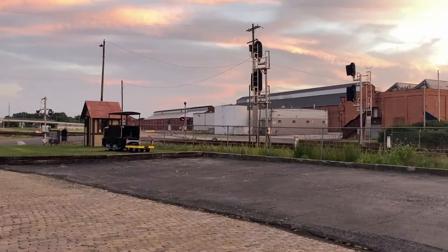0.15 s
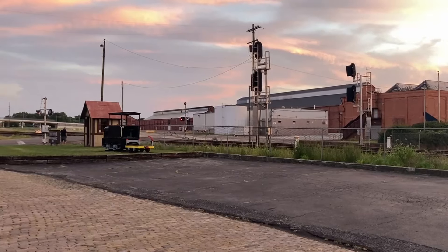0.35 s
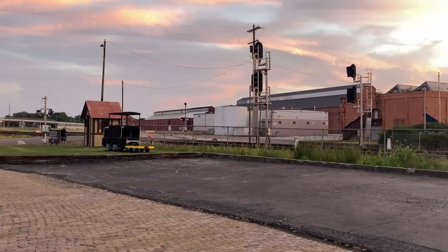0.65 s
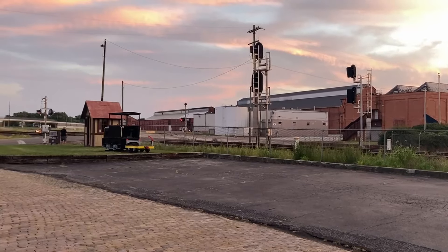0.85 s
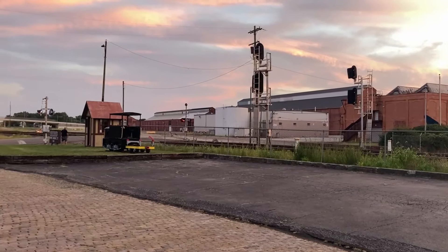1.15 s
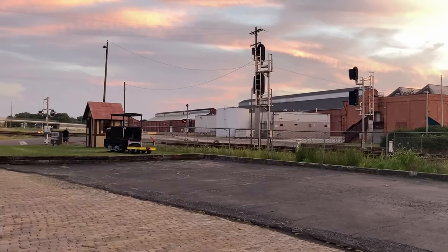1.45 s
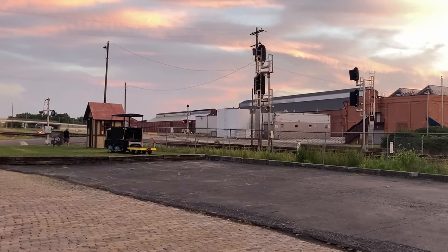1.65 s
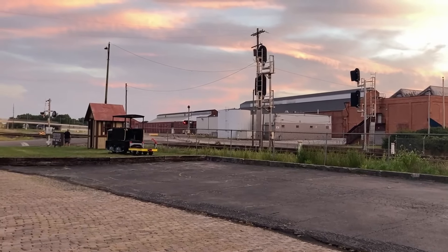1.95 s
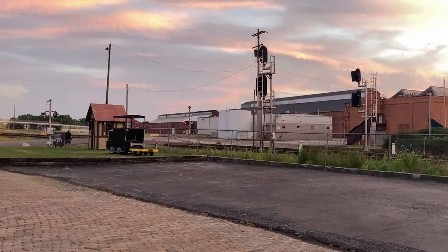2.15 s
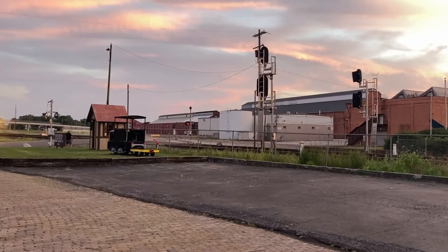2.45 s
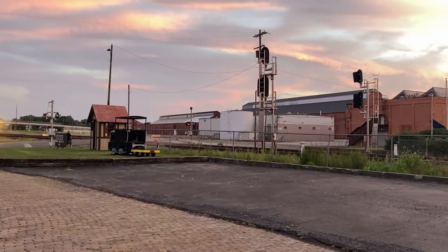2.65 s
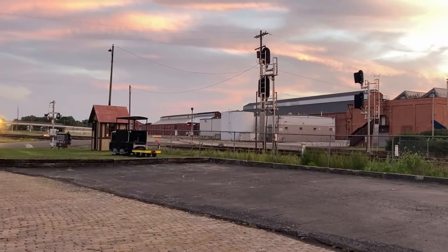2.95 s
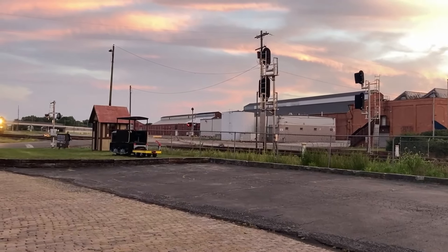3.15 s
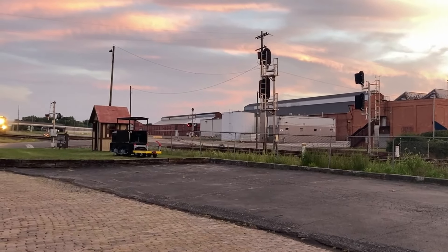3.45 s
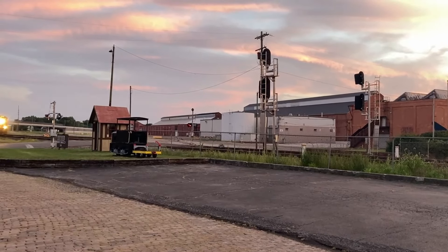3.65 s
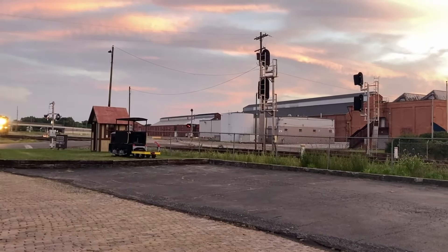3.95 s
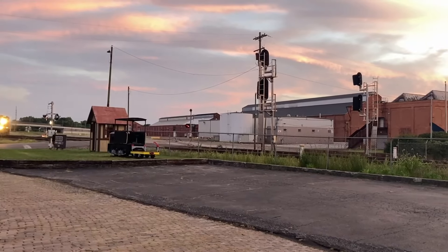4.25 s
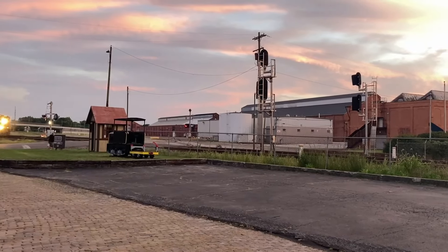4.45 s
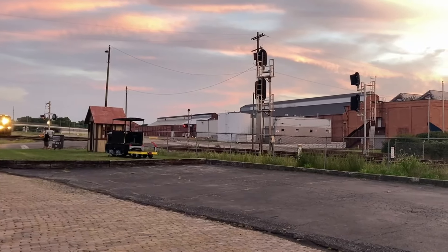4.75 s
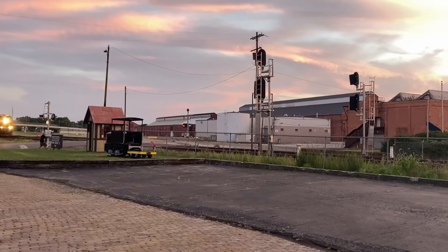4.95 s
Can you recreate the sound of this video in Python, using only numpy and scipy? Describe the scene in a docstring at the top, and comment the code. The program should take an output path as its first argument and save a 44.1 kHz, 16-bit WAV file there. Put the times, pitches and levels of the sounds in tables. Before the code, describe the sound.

Outdoors by a rail yard, a low diesel rumble with wavering hums and two faint crossing gongs. Just before two seconds a loud five-note air horn blows for about a second and a half, its tone swelling and fading, leaving a dull echo. After a tiny rustle close to the microphone, a second, brighter blast holds to the end. Stereo handheld pickup, slightly overloaded.

```python
"""A freight locomotive nears a level crossing: diesel rumble in noise bands, wavering hums, two far gongs.
At 1.9 s its five-bell air horn blows; each bell is a reed-like diaphragm giving a stack of harmonics.
Echoes off sheds along the track arrive slightly flat, so every partial swells and fades; a dull tail follows.
A bright rustle close by comes just before the second, brighter blast at 4.3 s, which holds to the end."""
import sys
import numpy as np
from scipy import signal
from scipy.fft import next_fast_len
from scipy.io import wavfile
from scipy.ndimage import uniform_filter1d

SR = 44100
rng = np.random.default_rng(int(sys.argv[2]) if len(sys.argv) > 2 else 0)


def wrap_up_sound(samples):
    """Save the sound to the file named by the first command line argument, as 16-bit audio."""
    columns = np.atleast_2d(samples).T
    # keep every value between -1 and 1, then stretch to whole-number steps
    tamed = np.clip(columns, -1, 1)
    steps = np.round(tamed * 32767).astype(np.int16)
    wavfile.write(sys.argv[1], SR, steps)


N = 224414
STEP = 16   # samples per step of slow signals


def from_db(db):
    """Decibels to amplitude."""
    return 10 ** (np.asarray(db) / 20)


def rms_one(x):
    """Scale to an rms of one."""
    return x / np.sqrt(np.mean(np.abs(x) ** 2) + 1e-20)


def in_time(rows, t):
    """Draw each column of an automation table as straight lines over time."""
    s, *columns = np.transpose(rows)
    return [np.interp(t, s, column) for column in columns]


def at_hz(points, hz):
    """Read a spectral curve, straight over log frequency."""
    curve_hz, values = np.array(points).T
    return np.interp(np.log(hz), np.log(curve_hz), values)


def filtered(x, order, hz, kind="low"):
    """Butterworth filter."""
    return signal.sosfilt(signal.butter(order, hz, kind, fs=SR, output="sos"), x)


def wander(rate_hz, size, channels=1):
    """Slow complex noise, one value per STEP: white through a double one-pole low-pass, rms 1."""
    run_in = 1000
    r = np.exp(-2 * np.pi * STEP * rate_hz / SR)
    shape = (channels, size + run_in)
    white = rng.standard_normal(shape) + 1j * rng.standard_normal(shape)
    return rms_one(signal.lfilter([1], [1, -2 * r, r * r], white)[:, run_in:])


def spread(slow, size):
    """Bring slow rows up to one value per sample."""
    return np.array([np.interp(np.arange(size) / STEP, np.arange(len(row)), row) for row in slow])


def wander_full(rate_hz, channels=1):
    """Slow complex noise over the whole scene, one value per sample."""
    return spread(wander(rate_hz, N // STEP + 1, channels), N)


# Diesel spectrum: pitch_hz, level_db (relative, per Hz)
RUMBLE = [(20, -36), (40, -11), (69, -3.5), (110, -13), (241, -22), (444, -37), (650, -35), (954, -30.5),
          (1360, -38.5), (2000, -43), (3150, -47.5), (3450, -55), (6120, -51.5), (9000, -79), (11000, -99)]
# Stereo likeness of the rumble: pitch_hz, likeness (1 = same in both ears)
LIKENESS = [(60, 1), (170, 1), (500, 0.97), (1400, 0.51), (4000, 0.35), (9000, 0.84)]
# Hums: pitch_hz, width_hz, level_db (over the rumble, before the bass shelf)
HUMS = [(60, 9.0, -6), (269, 6.0, -13), (802, 10.0, -24.5), (920, 15.0, -23), (985, 18.0, -21.5),
        (1060, 15.0, -25), (3068, 18.0, -33.5), (3200, 60.0, -36)]
BASS_BELOW_HZ, TREBLE_ABOVE_HZ = 110, 5000
HUM_PATCHY_DB = 4     # how deeply the far hums come and go on the air
RUMBLE_PAN_DB = 1.9   # left over right


def engine(bass_db, treble_db, patchy_db):
    """Third-octave bands of stereo noise with slow flicker, plus narrow wavering hums."""
    out = 0
    edges = 22 * 2 ** np.arange(0, 9.2, 1 / 3)
    white = rng.standard_normal((2, 2, N))   # neighbouring bands take different noise
    for k, (low, high) in enumerate(zip(edges, edges[1:])):
        mid, side = filtered(white[k % 2], 2, [low, high], "band")
        hz = np.sqrt(low * high)
        alike = np.clip(at_hz(LIKENESS, hz), 0, 1)
        flicker_db = patchy_db * wander_full(4.1)[0].real
        gain = from_db(at_hz(RUMBLE, hz) + treble_db * (hz > TREBLE_ABOVE_HZ) + flicker_db)
        out = out + gain * (np.sqrt(1 + alike) * mid + np.sqrt(1 - alike) * side * [[1], [-1]])
    out = rms_one(out)
    t = np.arange(N) / SR
    for hz, width_hz, db in HUMS:
        patches = from_db(HUM_PATCHY_DB * (hz > 500) * wander(3.0, N // STEP + 1).real)
        waver = spread(patches * wander(width_hz, N // STEP + 1), N)
        out = out + from_db(db) * np.real(waver * np.exp(2j * np.pi * hz * t))
    bass_filter = signal.butter(2, BASS_BELOW_HZ, fs=SR, output="sos")
    bass = signal.sosfiltfilt(bass_filter, out)
    shelved = out + (from_db(bass_db) - 1) * bass
    return shelved * from_db([[RUMBLE_PAN_DB / 2], [-RUMBLE_PAN_DB / 2]])


STROKE_S = .002   # rise time of a struck mode


def ring(s, hz, db, t60):
    """A mode struck at s: a sine with a fast rise and an exponential decay."""
    since = np.maximum(np.arange(N) / SR - s, 0)
    return from_db(db - 60 * since / t60) * (1 - np.exp(-since / STROKE_S)) * np.sin(2 * np.pi * hz * since)


# Crossing gongs: start_s, period_s, modes [pitch_hz, level_db (over the rumble), t60_s]
GONGS = [(.65, .68, [(1575, -24, 1.2), (1612, -21, .4), (2907, -31, 1.5)]), (.09, .68, [(1760, -26, 3.0),
         (1769, -27, 3.0)])]
GONG_WAVER, GONG_WAVER_HZ = .55, 14.0   # far strokes come and go on the air: depth, rate


def gongs():
    """Each gong is struck at a steady pace, a little harder or softer per mode, and rings in its few modes."""
    out = 0
    for first_s, period_s, modes in GONGS:
        strokes = 0
        for s in np.arange(first_s, N / SR, period_s):
            for hz, db, t60 in modes:
                strokes = strokes + ring(s, hz, db + rng.normal(0, 2.3), t60)
        out = out + (1 + GONG_WAVER * wander_full(GONG_WAVER_HZ)[0].real) * strokes
    return out


# Horn valve: open_s, shut_s, gone_s
BLASTS = [(1.88, 3.3, 3.55), (4.27, 5.2, 5.2)]
# Reference pitch, one curve per blast: time_s, pitch_hz
PITCH = [
    [(1.88, 414), (1.96, 412.5), (2.15, 407.6), (2.35, 407.8), (2.7, 401.1), (2.95, 407.3), (3.2, 407.5),
     (3.4, 404.5)],
    [(4.27, 416), (4.34, 410.4), (4.55, 409), (4.77, 404.7), (4.9, 410.3), (5.09, 409.5)],
]
# Upper harmonics come and go as sheds hide the horn, one curve per blast: time_s, level_db
BLARE = [
    [(1.9, -36), (1.97, -35), (2.036, -28), (2.506, -28.5), (2.64, -29), (2.9, -36), (2.988, -31),
     (3.214, -40), (3.274, -34.5), (3.3, -40.5)],
    [(4.28, -34.5), (4.36, -31), (4.516, -23.5), (4.65, -31), (4.74, -29.5), (4.81, -32), (4.97, -24),
     (5.06, -22.5)],
]
# Tone colour of the upper harmonics: pitch_hz, level_db (over the blare)
FLARE = [(600, -5.5), (1000, -12.5), (1200, -19.5), (1330, -19), (1560, -21), (1830, -25), (2050, -25),
         (2650, -26), (2850, -32), (3200, -30), (3600, -37.5), (4000, -32), (4900, -46), (5600, -56),
         (8100, -50.5), (9100, -60), (9800, -90.5), (10600, -56.5), (12000, -59.5)]
# Echoes from the sides, opposite in the two ears: pitch_hz, level_db (against the sound from ahead)
SIDEWAYS = [(330, -11), (500, -6), (1000, -4), (3600, -4), (6000, 3), (8200, -8), (9200, -4)]
# Top octave lift of each blast, the second being nearer: level_db
BRIGHTER_DB = [2.1, 4.5]
TREBLE_SWING, BLARE_MEAN_DB = 0.58, -30.5   # extra top-octave dB per dB of blare away from this mean
FADING_DB, FADING_HZ = 4, 5.0               # slow fading of overtones: depth, rate
BITE_DB, BITE_S, BITE_ABOVE = 5.5, .1, 1.5  # bells above this pitch ratio start with bright overtones
# Echo scatter: level at 500 Hz and its ceiling, trim for strong partials; spread and flatness as pitch ratios
SCATTER_DB, SCATTER_TOP_DB, STRONG_ECHO_DB = -5, -1.0, -6
SCATTER_SPREAD, SCATTER_FLAT = 0.009, .004
ECHOES_GATHER_S = 0.045   # the direct wave comes first, clean
SIDEWAYS_HZ, SIDEWAYS_EVEN_S = 3.0, .25   # drift rate; time over which their level evens out
SWELL_DB, SWELL_S, RELEASE_DB_PER_S = 6, 0.025, 95   # soft start; decay after the valve shuts


def bell(rows, orders, ratio, pan_db, speaks_s, brass_db, blast):
    """Harmonics of one diaphragm over one blast: the direct wave plus a flat, spread cloud of echoes per ear."""
    open_s, shut_s, gone_s = BLASTS[blast]
    first = round(open_s * SR)
    t = np.arange(first, min(round(gone_s * SR), N)) / SR
    hz = ratio * in_time(PITCH[blast], t)[0]
    phase = 2 * np.pi * np.cumsum(hz) / SR
    mean_hz = np.mean(hz)
    slow_t = t[::STEP]
    slow_since = np.maximum(slow_t - speaks_s, 0)
    blare_db = in_time(BLARE[blast], slow_t)[0]
    strongest_db = in_time(rows, slow_t)
    gathered = 1 - np.exp(-slow_since / ECHOES_GATHER_S)
    out = np.zeros((2, len(t)))
    for k in range(1, int(11900 / mean_hz) + 1):
        partial_hz = k * mean_hz
        if k in orders:
            db = strongest_db[orders.index(k)]
        else:
            height = np.clip(np.log2(partial_hz / 4000), 0, 1)   # the air eats the top octave by turns
            top_db = BRIGHTER_DB[blast] + TREBLE_SWING * (blare_db - BLARE_MEAN_DB)
            db = blare_db + at_hz(FLARE, partial_hz) + brass_db + height * top_db
            db = db + gathered * FADING_DB * wander(FADING_HZ, len(slow_t))[0].real
            db = db + BITE_DB * (ratio > BITE_ABOVE) * np.exp(-slow_since / BITE_S)

        # short waves scatter more
        echo_db = min(SCATTER_DB + 10.9 * np.log2(partial_hz / 500), SCATTER_TOP_DB)
        echo_db += STRONG_ECHO_DB * (k in orders and partial_hz < 1500)
        echo = gathered * from_db(echo_db)
        mid, side = wander(SCATTER_SPREAD * partial_hz, len(slow_t), channels=2)
        flat = np.exp(-1j * k * SCATTER_FLAT * phase[::STEP])
        ahead = from_db(db) * (1 + echo * mid * flat) / np.hypot(1, echo)

        even = np.sqrt(uniform_filter1d(from_db(2 * db), round(SIDEWAYS_EVEN_S * SR / STEP)))
        side_level = gathered * even * from_db(at_hz(SIDEWAYS, partial_hz))
        drift = wander(SIDEWAYS_HZ, len(slow_t))[0]
        sideways = side_level * (drift + echo * side * flat) / np.hypot(1, echo)
        paths = np.sqrt(2) * (ahead + sideways * np.array([[1], [-1]]))   # rms to peak
        out += np.real(spread(paths, len(t)) * np.exp(1j * k * phase + 1.1j * k ** 2))
    since = np.maximum(t - speaks_s, 0)
    air_db = -SWELL_DB * np.exp(-since / SWELL_S) - RELEASE_DB_PER_S * np.maximum(t - shut_s, 0)
    gate = from_db(air_db) * np.clip(since / 0.0011, 0, 1) * np.clip((gone_s - t) / 0.027, 0, 1)
    whole = np.zeros((2, N))
    whole[:, first:first + len(t)] = out * gate * from_db([[pan_db / 2], [-pan_db / 2]])
    return whole


# Strongest harmonics of each bell as they arrive, one curve per blast, rms before swell and pan
# time_s, harmonic_1_db, harmonic_3_db
BELL_LOW = [
    [(2.02, -22, -28), (2.28, -30.5, -29), (2.568, -26, -36.5), (2.628, -36.5, -34.5), (2.714, -50, -57),
     (2.814, -26, -32), (2.886, -43, -37.5), (2.91, -34.5, -60), (2.954, -24, -29.5), (3.042, -26, -30.5),
     (3.142, -34, -62), (3.242, -31.5, -32), (3.3, -29, -49)],
    [(4.39, -26.5, -40.5), (4.422, -21, -25), (4.52, -21.5, -28), (4.572, -18.5, -50), (4.62, -25, -37),
     (4.738, -53, -32), (4.766, -39.5, -41), (4.818, -25, -40.5), (4.852, -35, -47), (4.894, -23, -34),
     (4.938, -22.5, -33), (4.998, -25.5, -25), (5.07, -25.5, -31)],
]
# time_s, harmonic_1_db, harmonic_2_db
BELL_THIRD = [
    [(1.95, -25, -28.5), (2.046, -22, -21.5), (2.318, -18.5, -20), (2.374, -16.5, -42.5),
     (2.438, -34, -19.5), (2.494, -42, -33.5), (2.66, -23.5, -20), (2.708, -34.5, -32.5), (2.768, -43, -23),
     (2.828, -39, -34.5), (2.886, -28, -20), (2.934, -34.5, -44.5), (2.956, -29, -24.5), (3.224, -31, -19),
     (3.3, -42, -25), (3.43, -32, -18)],
    [(4.33, -30, -33.5), (4.354, -24, -32.5), (4.576, -27, -17), (4.638, -33.5, -32.5), (4.718, -32.5, -21),
     (4.776, -35, -17.5), (4.82, -22.5, -28.5), (4.848, -34, -25), (4.876, -26.5, -41), (4.898, -27, -28.5),
     (4.922, -27, -24), (4.974, -26, -24), (5.008, -30, -28), (5.07, -27, -25)],
]
# time_s, harmonic_1_db, harmonic_2_db, harmonic_4_db
BELL_FOURTH = [
    [(1.96, -19.5, -33.5, -32), (2.09, -19, -31, -31), (2.194, -35.5, -28, -30.5), (2.34, -26, -20.5, -42),
     (2.4, -28.5, -28, -54), (2.444, -28, -35.5, -37), (2.546, -27.5, -19.5, -44), (2.602, -49, -45.5, -37),
     (2.654, -33.5, -22, -34.5), (2.788, -35, -23, -51), (2.992, -32.5, -28.5, -34.5),
     (3.094, -27, -23.5, -56), (3.3, -38.5, -31.5, -46)],
    [(4.34, -31, -34, -51.5), (4.392, -36, -30, -51), (4.512, -34, -28.5, -36), (4.598, -28, -27, -48.5),
     (4.628, -26, -25, -55), (4.666, -32.5, -19.5, -51), (4.716, -35.5, -26, -54), (4.778, -43, -19.5, -45),
     (4.828, -25.5, -24, -51), (4.846, -33, -33, -49), (4.884, -49, -22, -41), (5.02, -39, -33.5, -37),
     (5.07, -37, -29, -37)],
]
# time_s, harmonic_1_db
BELL_SIXTH = [
    [(1.99, -44), (2.084, -34), (2.142, -40), (2.194, -24), (2.598, -34), (2.62, -43.5), (2.77, -33),
     (3.066, -41), (3.098, -31.5), (3.3, -39.5)],
    [(4.36, -37.5), (4.404, -33.5), (4.456, -38), (4.482, -35), (4.6, -27), (4.65, -28), (4.678, -32),
     (4.908, -34), (4.942, -31), (5.07, -28)],
]
# time_s, harmonic_1_db, harmonic_2_db
BELL_OCTAVE = [
    [(1.91, -24.5, -49.5), (2.044, -20.5, -34), (2.16, -20.5, -52), (2.296, -23, -28.5), (2.35, -16, -24.5),
     (2.386, -24.5, -39.5), (2.498, -30.5, -29), (2.528, -38.5, -48.5), (2.622, -14.5, -34),
     (2.698, -46, -45), (2.796, -14.5, -46.5), (2.838, -25.5, -61), (2.866, -39.5, -45), (2.946, -23, -42),
     (3.292, -24, -40.5)],
    [(4.3, -33, -46), (4.332, -31, -34.5), (4.524, -23.5, -29), (4.57, -44.5, -42), (4.614, -16.5, -36),
     (4.646, -24.5, -50), (4.674, -13, -43), (4.702, -17, -41.5), (4.73, -34, -44), (4.754, -17, -48),
     (4.782, -18, -41.5), (4.812, -14, -41), (4.864, -24, -37.5), (4.962, -27, -30.5), (4.984, -33, -37.5),
     (5.07, -24.5, -25)],
]
# The five bells; the smallest speaks first, the largest last: curves, harmonic numbers,
# pitch_ratio (to the reference), pan_db (left over right), per blast [start_s, overtones_db (over the blare)]
HORN = [(BELL_LOW, (1, 3), .8135, 1, [(1.99, 6.5), (4.365, 4)]), (BELL_THIRD, (1, 2),
        .999, -0.82, [(1.915, 6.5), (4.30, 4.5)]), (BELL_FOURTH, (1, 2, 4), 1.096, -2.4, [(1.93, 7),
        (4.315, 3)]), (BELL_SIXTH, (1,), 1.273, -5.5, [(1.96, 4.5), (4.335, -0.5)]), (BELL_OCTAVE, (1, 2),
        1.607, -0.077, [(1.894, 10), (4.279, 8)])]
# First puff into the smallest bell: start_s, pitch_hz, t60_s, level_db
PUFFS = [(1.892, 1954, 0.092, -26), (4.279, 1917, 0.08, -28.5)]
FLUTTER_DB, FLUTTER_HZ, FLUTTER_ABOVE_HZ = -8, 110, 1400   # roughness: level, rate, lowest pitch


def horn():
    """All bells in both blasts, each led by a puff; eddies in the air roughen the upper chord."""
    chord = 0
    for curves, orders, ratio, pan_db, blown in HORN:
        for blast in range(2):
            chord = chord + bell(curves[blast], orders, ratio, pan_db, *blown[blast], blast=blast)
    rough = filtered(chord * wander_full(FLUTTER_HZ).real, 4, FLUTTER_ABOVE_HZ, "high")
    puffs = sum(ring(s, hz, db, t60) for s, hz, t60, db in PUFFS)
    return chord + from_db(FLUTTER_DB) * rough + puffs


YARD_DB, YARD_T60_S, YARD_CUT_HZ = -23.5, 3.0, 1800
YARD_WAVER_HZ, YARD_WAVER_RAD = 9.0, 2.1   # phase waver: rate, depth


def yard(x):
    """Dull diffuse echoes from sheds and wagons: decaying noise of its own for each ear."""
    t = np.arange(2 * SR) / SR
    tail = rng.standard_normal((2, len(t))) * from_db(-60 * t / YARD_T60_S) * np.clip(t / 0.061, 0, 1)
    tail = filtered(tail, 1, YARD_CUT_HZ)
    tail = tail / np.sqrt(np.sum(tail ** 2, axis=1, keepdims=True))
    wet = signal.fftconvolve(x, tail, axes=1)
    analytic = signal.hilbert(wet, next_fast_len(N + len(t)))[:, :N]
    # the paths shift as the train moves
    waver = np.exp(1j * YARD_WAVER_RAD * wander_full(YARD_WAVER_HZ, channels=2).real)
    return from_db(YARD_DB) * np.real(waver * analytic)


# Brief bright rustle close by: start_s, length_s, level_db (before its fade in and out)
RUSTLE = (4.157, 0.03, -56)


def rustle():
    """A short burst of treble noise under a half-sine envelope."""
    s, length_s, db = RUSTLE
    inside = np.clip((np.arange(N) / SR - s) / length_s, 0, 1)
    hiss = filtered(rng.standard_normal((2, N)), 2, [2200, 6000], "band")
    return from_db(db) * rms_one(hiss) * np.sin(np.pi * inside)


# Background automation: time_s, level_db, bass_db (over level), treble_db (lift before levelling)
ENGINE = [(0.05, -28.5, 3, 0), (0.54, -29, 2.5, 0), (1.2, -27.5, 2.5, -2), (2.08, -27.5, 2.5, -2),
          (2.42, -33, 0.5, 5), (3.4, -30, -4, -5.5), (4.1, -28.5, -1, -0.5), (5.05, -30, -1, 4)]
LEFT_LAG_S = 0.0003765


def scene():
    """Mix the engine and gongs, which rise and sink together, with the horn, its yard echoes and the rustle."""
    t = np.arange(N) / SR
    level_db, bass_db, treble_db = in_time(ENGINE, t)
    background = from_db(level_db)
    blasts = horn()
    left, right = background * engine(bass_db, treble_db, patchy_db=2.2)
    rumble = np.array([np.interp(t - LEFT_LAG_S, t, left), right])   # reaches the left a little late
    return blasts + yard(blasts) + rustle() + rumble + background * gongs()


MIC_CUT_HZ, CUTOFF_HZ = 38, 12100   # bass roll-off, top cut
MIC_BEND, MIC_TOP = 0.29, 1.6       # lopsided overload amount, symmetric overload ceiling


def record(dry):
    """Bass rolls off, loud chords bend into sum and difference tones, the top is cut."""
    thin = filtered(dry + MIC_BEND * dry ** 2, 3, MIC_CUT_HZ, "high")
    bent = MIC_TOP * np.tanh(thin / MIC_TOP)
    return signal.sosfilt(signal.cheby2(12, 70, CUTOFF_HZ, fs=SR, output="sos"), bent)


dry = scene()
out = record(dry)
wrap_up_sound(out)
```